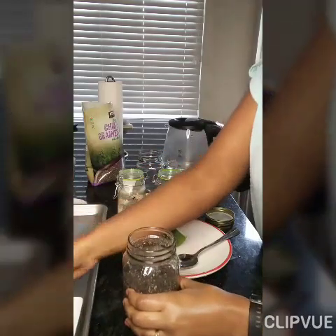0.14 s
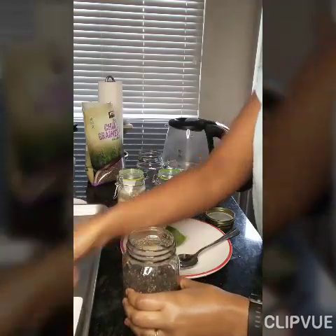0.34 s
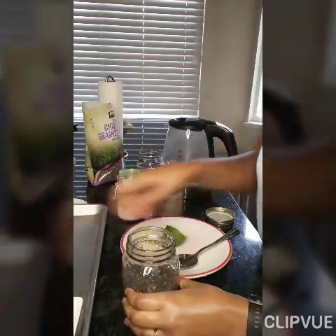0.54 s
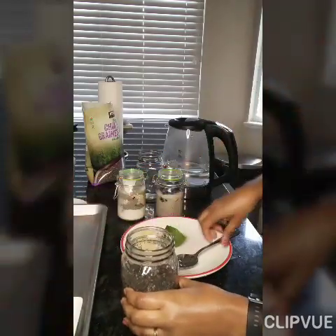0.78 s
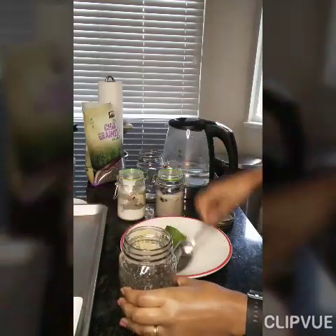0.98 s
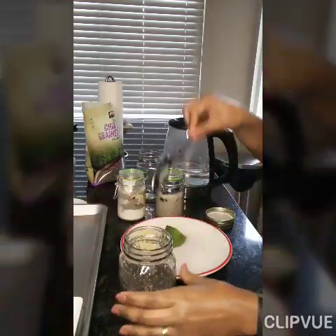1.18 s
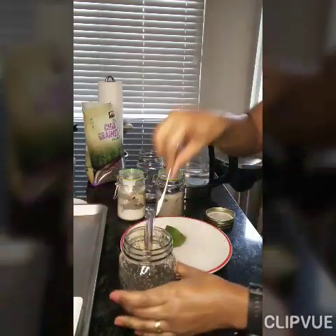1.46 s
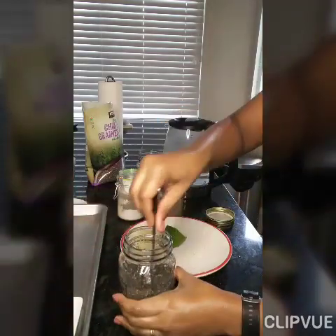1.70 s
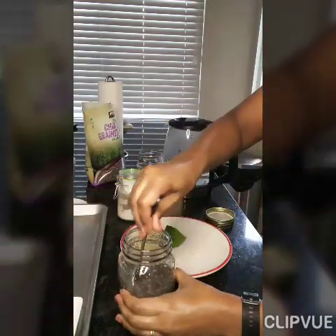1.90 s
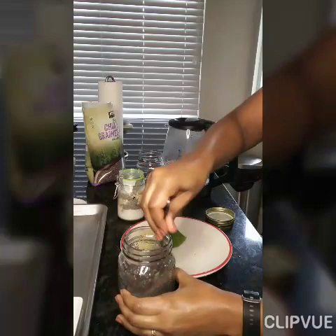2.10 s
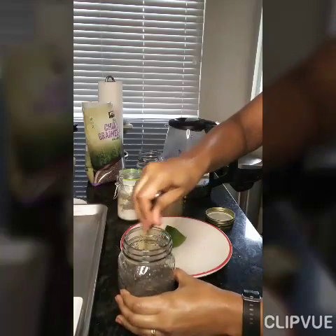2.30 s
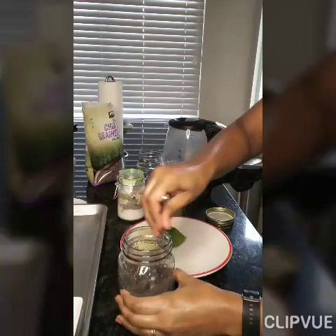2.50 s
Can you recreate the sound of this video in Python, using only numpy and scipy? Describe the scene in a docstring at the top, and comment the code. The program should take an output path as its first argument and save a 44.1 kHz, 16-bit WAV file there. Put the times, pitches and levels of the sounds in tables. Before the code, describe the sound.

A metal spoon knocks and rattles inside a full glass jar, stirring in a quiet kitchen

```python
"""Stirring a full glass jar in a quiet kitchen

Small clicks at the side, then a spoon is picked off a china plate with knocks and a short skid;
from 1.6 s it knocks and rattles inside a full glass jar while a drink is stirred. Each blow is a noise
burst with short dying sines, and the spoon and glass ring on longer. Rumble, hiss and noise-tail
room sound lie around them, heard through two unlike microphone ports."""
import sys
import numpy as np
from scipy import signal
from scipy.fft import rfft
from scipy.io import wavfile
from scipy.ndimage import uniform_filter1d

SR = 44100
rng = np.random.default_rng(int(sys.argv[2]) if len(sys.argv) > 2 else 0)


def bounce(signal):
    """Save signal as a 16-bit WAV file at the path given by the first command-line argument."""
    frames = np.transpose(np.atleast_2d(signal))
    limited = np.clip(frames, -1, 1)
    pcm = np.round(limited * 32767).astype(np.int16)
    wavfile.write(sys.argv[1], SR, pcm)


N = 116865


def amp(db):
    """Amplitude factor of a level in dB."""
    return 10 ** (np.asarray(db) / 20)


def evened(x):
    """Scale to an RMS of one."""
    return x / np.sqrt(np.mean(x ** 2) + 1e-20)


def read(points, hz):
    """Read a curve of (Hz, value) points, straight between them on a log frequency axis."""
    f, value = np.transpose(points)
    return np.interp(np.log(hz + 1), np.log(f + 1), value)


def coloured(x, db):
    """Minimum-phase filter with the gain db(hz), so nothing sounds ahead of the blow."""
    hz = abs(np.fft.fftfreq(2048, 1 / SR))
    log_gain = np.log(amp(np.maximum(db(hz), -90)))
    taps = np.fft.ifft(np.exp(np.conj(signal.hilbert(log_gain)))).real
    return signal.oaconvolve(x, taps[:1024])[:len(x)]


def air():
    """Low appliance rumble and faint hiss in slowly drifting patches; an earlier click is dying away."""
    # Each row: frequency in Hz, relative level in dB of the steady air.
    air_colour = [(25, -42.5), (48, -19), (64, 4), (80, -9.5), (155, -5), (260, -19.5), (350, -6),
                  (460, -11.5), (580, -4), (720, -18.5), (1100, -25.5), (3000, -38.5), (7000, -42.5),
                  (8600, -61), (10000, -40.5), (13400, -44), (16300, -53.5)]
    # Each row: frequency in Hz, left-right likeness (1 same, 0 unrelated, negative opposed).
    air_likeness = [(60, 0.94), (240, 0.65), (950, 0.35), (3770, 0.62), (15000, -0.42)]
    # Dying room sound of the earlier click. Each row: frequency in Hz, relative level in dB per Hz.
    fading_colour = [(1200, -40), (3200, -24), (5500, -36.5), (9000, -70)]
    steady_db, fading_db, fading_t60_s = -57.5, -34, 0.64
    patch_db = 1.3

    frames, hz = N // 1024 + 5, np.fft.rfftfreq(4096, 1 / SR)
    a, b, c, d, patches = rng.standard_normal((frames, 2049, 5)).T
    patches = uniform_filter1d(patches, size=2, axis=1)  # over time
    patches = evened(uniform_filter1d(patches, size=24, axis=0))  # over frequency

    same = np.clip(read(air_likeness, hz), -1, 1)[:, None]
    left = a + 1j * b
    right = same * left + np.sqrt(1 - same ** 2) * (c + 1j * d)
    spectrum = np.array([left, right]) * amp(read(air_colour, hz)[:, None] + patch_db * patches)
    noise = signal.istft(spectrum, nperseg=4096, noverlap=3072)[1][:, :N]
    steady = amp(steady_db) * evened(noise)

    fading = np.array([coloured(x, lambda f: read(fading_colour, f)) for x in rng.standard_normal((2, N))])
    return steady + fading * amp(fading_db - 60 * np.arange(N) / SR / fading_t60_s)


def rung(modes, t):
    """Dying sines, a little different in pitch and level at each blow, wavering in the moving hand."""
    spread_db, flutter_db = 2.5, 4
    hz, db, t60 = np.transpose(modes)[:, :, None]
    db = db + spread_db * rng.standard_normal(hz.shape)
    waver = uniform_filter1d(rng.standard_normal((len(hz), len(t))), size=400) * 20  # back to unit spread
    waver *= np.minimum(t / 0.03, 1)  # the waver sets in over 30 ms
    turns = hz * rng.uniform(0.997, 1.003, hz.shape) * t
    return (amp(db + flutter_db * waver - 60 * t / t60) * np.sin(2 * np.pi * turns)).sum(0)


def contact_burst(crack, crack_s, t):
    """Noise of the contact: a quick tick stands out of a burst that falls 60 dB in crack_s seconds."""
    rise_s, tick_s, tick_db = 0.0003, 0.0037, -5.5
    fall = amp(-60 * t / crack_s) + amp(tick_db - 20 * t / tick_s)  # the tick falls 20 dB in tick_s
    burst = rng.standard_normal(len(t)) * fall * (1 - np.exp(-t / rise_s))
    burst = coloured(burst, lambda f: read(crack, f))
    return burst / abs(burst).max()


def blow(levels_db, modes, crack, crack_db, crack_s, rings=()):
    """A burst and short modes, shaded band by band by where the blow lands, and the long rings."""
    # Edges in Hz of the bands whose levels are set for each blow.
    edges_hz = np.array([400, 700, 1150, 2300, 4500, 8000, 16000])
    t, bands = np.arange(SR // 2) / SR, len(edges_hz) - 1
    sound = amp(crack_db) * contact_burst(crack, crack_s, t) + rung(modes, t)

    # Level of each band in the first 512 samples, brought to the level asked for.
    power = abs(rfft(sound[:512], 2048)) ** 2 / (512 * 1024)
    own_db = 10 * np.log10(np.add.reduceat(power, edges_hz * 2048 // SR)[:-1])
    middle_hz = np.sqrt(edges_hz[1:] * edges_hz[:-1])
    shade = list(zip(middle_hz, levels_db[:bands] - own_db))
    knock = coloured(sound, lambda f: read(shade, f))

    ringing = sum(amp(db) * rung(ring, t) for db, ring in zip(levels_db[bands:], rings))
    bass_cut = [(120, -26.5), (300, -12.5), (480, -2.5)]  # (Hz, dB)
    return coloured(knock + ringing, lambda f: read(bass_cut, f))


def struck(hits, **body):
    """All the blows on one object, each computed afresh and laid at its own time."""
    out = np.zeros(N + SR)
    for s, db, *bands_db in hits:
        sound = blow(db + np.array(bands_db), **body)
        start = round(s * SR)
        out[start:start + len(sound)] += sound
    return out[:N]


def small_clicks():
    """Something small clicks: contact noise and short modes, with no long ring."""
    # Each row: start in seconds, reference level in dB, then six band levels in dB from it, low to high.
    hits = [(0.116, -20.5, -23.5, -37, -27.5, -15, -19, -11.5),
            (0.182, -23.5, -21, -31.5, -25, -11.5, -21, -12.5),
            (0.216, -30, -15.5, -31.5, -24, -20, -14.5, -13.5)]
    # Each row: frequency in Hz, level in dB before the band shading, t60 in seconds.
    modes = [(629, 1.5, 0.044), (2340, -10.5, 0.044), (4260, -6, 0.026), (5950, -10, 0.06),
             (7500, -14, 0.012)]
    # Contact noise. Each row: frequency in Hz, relative level in dB per Hz.
    crack = [(180, -30.5), (300, -8.5), (740, 2.5), (1740, -9.5), (4010, 3), (9250, -2.5), (10800, -6),
             (15000, -15.5), (16300, -33)]
    return struck(hits, modes=modes, crack=crack, crack_db=11, crack_s=0.04)


def scrape(**body):
    """The spoon skids over the china: dense swarms of tiny blows, swelling and easing with the press."""
    # Each row: start in seconds, length in seconds, level in dB of the ticks at full press.
    skids = [(0.701, .075, -81.5), (0.821, 0.032, -43.5)]
    # Relative levels in dB of one tiny blow: six bands from low to high, then the low and high long ring.
    bands_db = [-13, 2.5, -4, 5.5, 1, -1, 1, -5.5]
    ticks_per_s = 1500

    t = np.arange(N) / SR
    press = np.zeros(N)
    for s, long_s, db in skids:
        progress = np.clip((t - s) / long_s, 0, 1)
        press += amp(db) * np.sin(np.pi * progress ** 0.76)
    ticks = (rng.random(N) < ticks_per_s / SR) * rng.standard_normal(N) * press
    return signal.oaconvolve(ticks, blow(np.array(bands_db), **body))[:N]


def spoon_on_plate():
    """The spoon leaves the china: short plate modes and contact noise, the spoon ringing on, and skids."""
    # Each row: start in seconds, reference level in dB, then in dB from it six band levels, low to high,
    # and the levels of the low and the high long ring.
    hits = [(0.655, -35, -11, -17, -12, -25, -41.5, -32, -24, -42.5),
            (0.775, -5.5, -25.5, -20.5, -15.5, -15.5, -19.5, -34.5, -29.5, -28)]
    # Each row: frequency in Hz, level in dB before the band shading, t60 in seconds.
    modes = [(711, -2, .045), (1400, -3, .045), (1750, -6, .035), (2100, -3, .04), (3580, -1, .03),
             (5390, -2, .03), (6977, -14, .05), (7900, -18, .05)]
    # Contact noise. Each row: frequency in Hz, relative level in dB per Hz.
    crack = [(180, -37), (300, -38.5), (648, -1.5), (2390, -6.5), (3570, -6), (4150, -9.5), (5330, -7.5),
             (10200, -26), (16300, -47)]
    # Low and high group of long rings. Each row: frequency in Hz, level in dB in its group, t60 in seconds.
    spoon_rings = [
        [(3140, -9.5, 0.18), (3157, 2, 0.31), (3280, -1, 0.14), (4393, -14, .15), (4463, -7.5, .28)],
        [(9270, -11.5, 0.24), (10390, -0.5, 0.19)],
    ]
    china = dict(modes=modes, crack=crack, crack_db=10, crack_s=0.058, rings=spoon_rings)
    return struck(hits, **china) + scrape(**china)


def spoon_in_jar():
    """The spoon knocks and rattles in the full jar: short modes and contact noise, the glass ringing on."""
    # Each row: start in seconds, reference level in dB, then in dB from it six band levels, low to high,
    # and the levels of the low and the high long ring.
    hits = [(1.569, -11, -30, -13.5, -23.5, -12.5, -18, -21, -14.5, -21),
            (1.604, -15, -26, -15.5, -17.5, -34, -17, -23, -8, -20),
            (1.621, -22, -14.5, -5, -20, -11.5, -24, -13.5, -7.5, -17),
            (1.631, -19.5, -25, -9.5, -17.5, -12.5, -28, -18, -5, -14.5),
            (1.731, -12, -18, -4, -14, -19, -33, -38.5, -19.5, -37),
            (1.85, -11, -16.5, -18.5, -19.5, -16, -19.5, -20, -19, -26),
            (1.877, -19.5, -10.5, -4.5, -10.5, -15.5, -25, -18.5, -20.5, -32),
            (1.942, -22.5, -11.5, -2.5, -5, -15, -23.5, -53, -35, -28),
            (1.99, -35, -12, 4, -9, -25, -10, -45, -9, -12),
            (2.015, -35.5, -9.5, 7, -8, -0.5, -2, -26, -8.5, -27),
            (2.024, -15.5, -13.5, -21, -10, -14.5, -13.5, -17.5, -16.5, -10.5),
            (2.033, -25, -13, -0.5, -28, -14, -21, -11.5, -35, -13),
            (2.246, -16.5, -16.5, -7, -20, -18.5, -26, -25, -23.5, -58),
            (2.262, -32, -7, -12, -2, -43, -38, -49, -8.5, -43),
            (2.374, -25.5, -15.5, -4.5, -6.5, -17, -33, -45, -13.5, -34),
            (2.454, -31, -7.5, -7, -18, -15, -53, -51, -44, -17),
            (2.47, -12.5, -24, -17.5, -20.5, -17, -18, -18.5, -16.5, -9.5),
            (2.538, -54, 0, -15, 2, -3, -23, -6, -30, 0)]
    # Each row: frequency in Hz, level in dB before the band shading, t60 in seconds.
    modes = [(686, 6.5, 0.019), (883.4, -3, 0.071), (930, 1.5, 0.041), (1264, 4, 0.013), (1504, -9, 0.07),
             (1770, -8, 0.082), (2482, -6.5, 0.046), (2840, -1.5, 0.035), (3120, -5, 0.034),
             (3516, -16, 0.057), (5500, -19.5, 0.071)]
    # Contact noise. Each row: frequency in Hz, relative level in dB per Hz.
    crack = [(120, -32), (200, -27.5), (782, 8.5), (1410, -6), (2040, 1.5), (8260, -15.5), (9060, -12.5),
             (10500, -21), (16300, -54)]
    # Low and high group of long rings. Each row: frequency in Hz, level in dB in its group, t60 in seconds.
    glass_rings = [
        [(543.5, -1, 0.33), (572.8, -5.5, 0.24)],
        [(1962, -9, 0.43), (2029, -3, 0.22), (2137, -9.5, 0.22)],
    ]
    return struck(hits, modes=modes, crack=crack, crack_db=9.5, crack_s=0.03, rings=glass_rings)


def room(x):
    """Noise tails dying by band, partly shared by both sides in the bass; three tails take turns."""
    # Decay of the kitchen. Each row: frequency in Hz, t60 in seconds.
    decay = [(250, 0.74), (1000, 0.58), (4000, 0.46), (8000, 0.39), (14000, 0.25)]
    # Each row: frequency in Hz, left-right likeness (1 same, 0 unrelated, negative opposed).
    room_likeness = [(200, 0.55), (500, 0.63), (800, 0.21), (1200, -0.12), (3000, .1), (8000, 0.093)]
    rise_s, turns_per_s = 0.0036, 3.7

    out, turn = np.zeros((2, N)), np.arange(N) / SR * turns_per_s
    for k in range(3):
        hz, t, (a, b) = signal.stft(rng.standard_normal((2, SR)), SR, nperseg=256)
        same = np.clip(read(room_likeness, hz), -1, 1)[:, None]
        spectrum = np.array([a, same * a + np.sqrt(1 - same ** 2) * b])
        spectrum = spectrum * amp(-60 * t / read(decay, hz)[:, None])
        tail = signal.istft(spectrum, SR, nperseg=256)[1]
        tail *= np.clip(np.arange(tail.shape[1]) / SR / rise_s, 0, 1)
        tail /= np.linalg.norm(tail[0])
        share = np.sqrt(2 / 3) * np.cos(np.pi * (turn + k / 3))  # the three powers add up to one
        out += signal.fftconvolve((x * share)[None], tail, axes=1)[:, :N]
    return out


def placed(x, pan_db, lag, wet_db):
    """Direct sound, pan_db louder and lag samples later on the left than on the right, and its room sound."""
    left = np.roll(x, lag) * amp(pan_db / 2)
    right = x * amp(-pan_db / 2)
    return np.array([left, right]) + amp(wet_db) * room(x)


def scene():
    """Clicks, plate and jar, each at its place before the microphone, in the air of the kitchen."""
    clicks = placed(small_clicks(), pan_db=-1, lag=-5, wet_db=-5)
    plate = placed(spoon_on_plate(), pan_db=-0.1, lag=4, wet_db=-4)
    jar = placed(spoon_in_jar(), pan_db=0.6, lag=6, wet_db=-5)
    return clicks + plate + jar + air()


def record(dry):
    """The left port has a notch and a peak in the treble, the right one is dull; then the band limit."""
    # Each row: frequency in Hz, left-right difference in dB: above 0 it dulls the right, below 0 the left.
    ports = [(60, 0.5), (250, -2.6), (500, 4), (1000, -1.5), (2500, -3), (5000, 1.5), (6800, 4.5),
             (8300, 29), (11000, 23.5), (15000, 7.5)]
    # Further gain of the left port. Each row: frequency in Hz, gain in dB.
    left_port = [(6500, -1.5), (8200, 0), (8900, -22), (9500, -0.5), (10600, 7.5), (12500, 4)]
    edge_hz = 16400
    left = coloured(dry[0], lambda f: read(left_port, f) + np.minimum(read(ports, f), 0))
    right = coloured(dry[1], lambda f: -np.maximum(read(ports, f), 0))
    band_limit = signal.firwin(511, edge_hz, window=("kaiser", 9), fs=SR)
    return signal.oaconvolve([left, right], band_limit[None], "same")


dry = scene()
out = record(dry)
bounce(out)
```